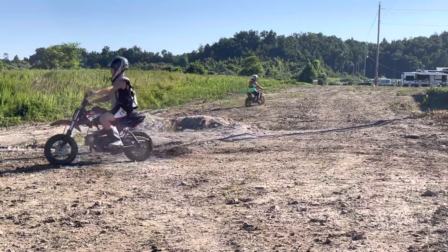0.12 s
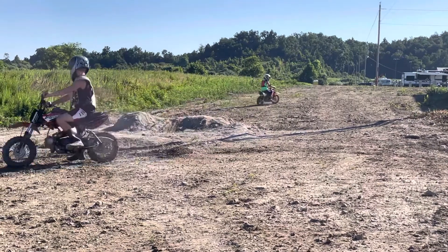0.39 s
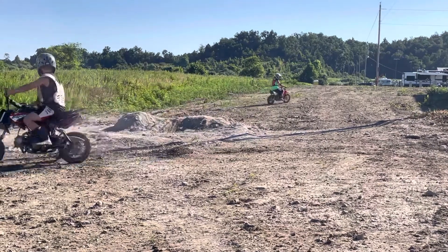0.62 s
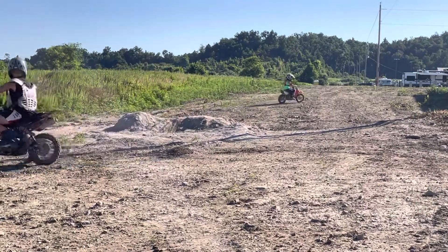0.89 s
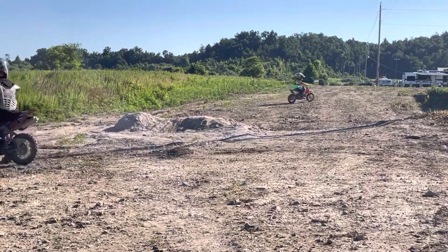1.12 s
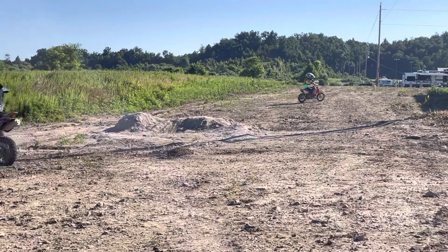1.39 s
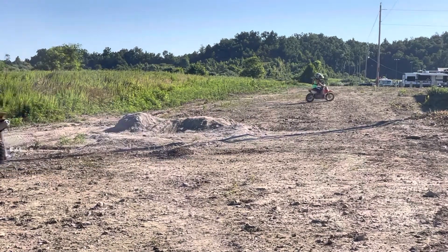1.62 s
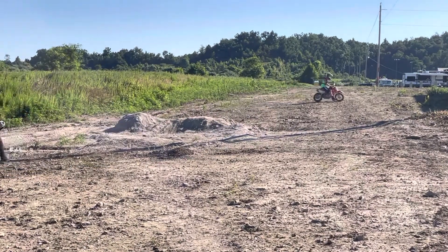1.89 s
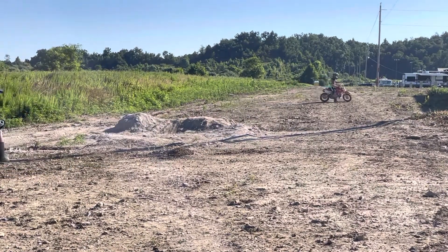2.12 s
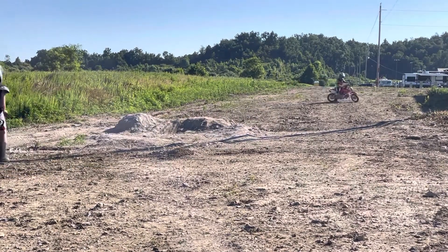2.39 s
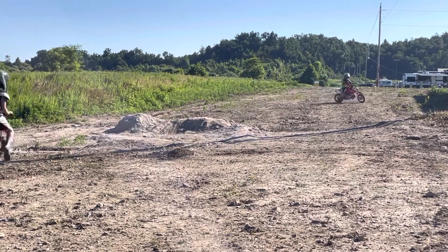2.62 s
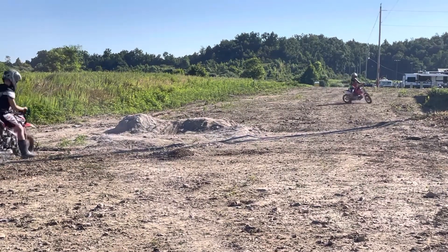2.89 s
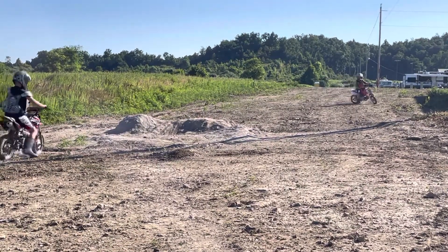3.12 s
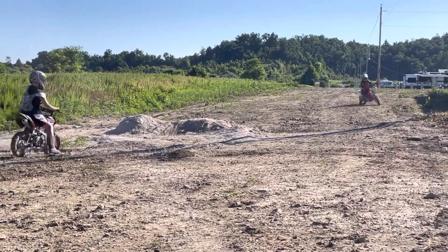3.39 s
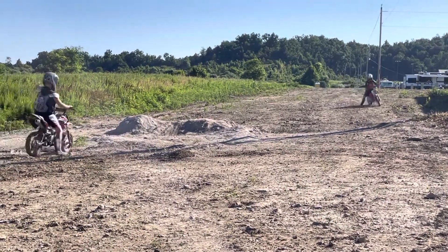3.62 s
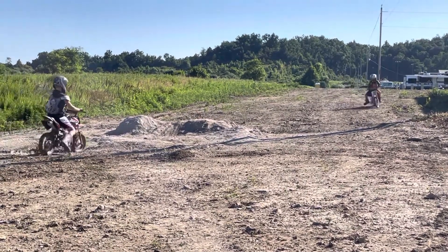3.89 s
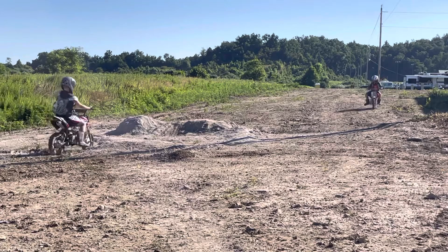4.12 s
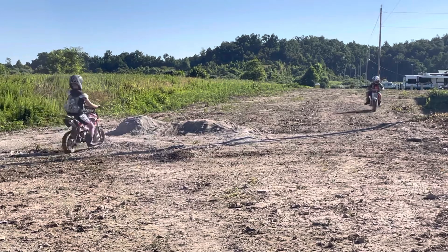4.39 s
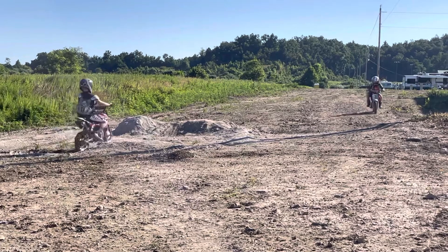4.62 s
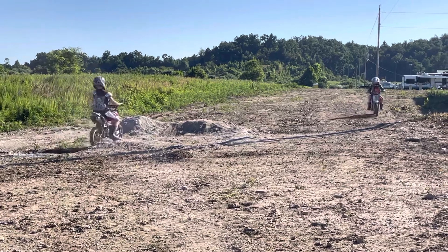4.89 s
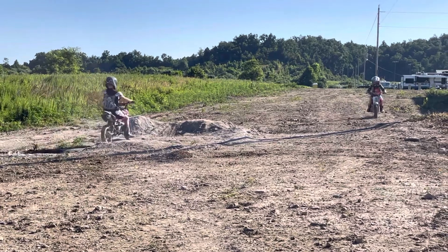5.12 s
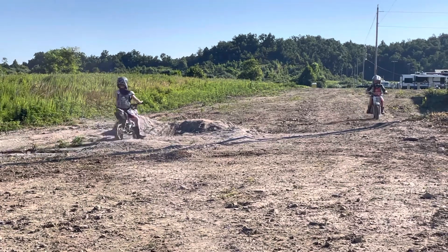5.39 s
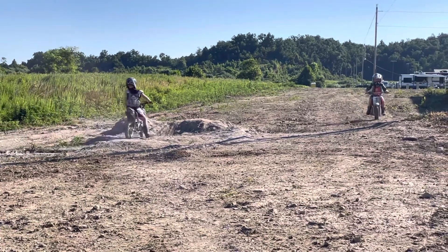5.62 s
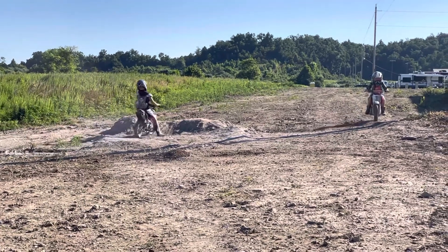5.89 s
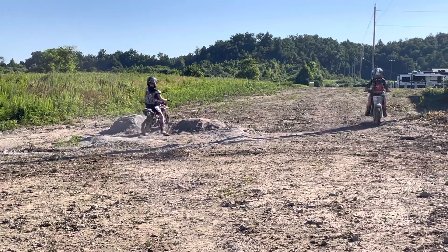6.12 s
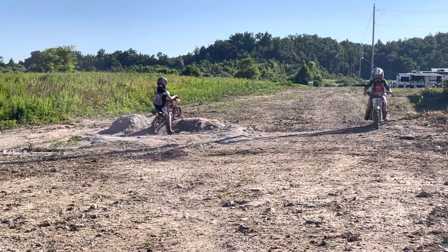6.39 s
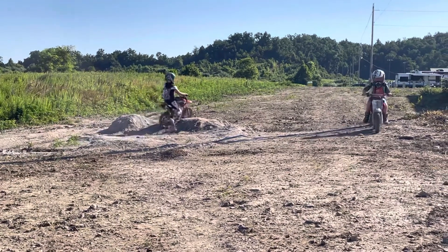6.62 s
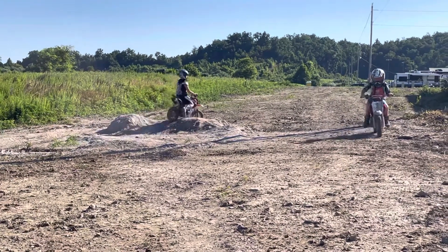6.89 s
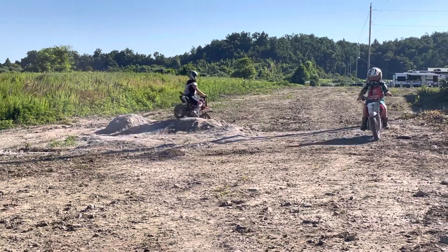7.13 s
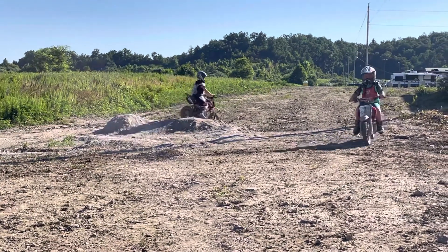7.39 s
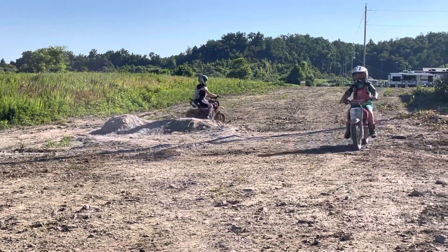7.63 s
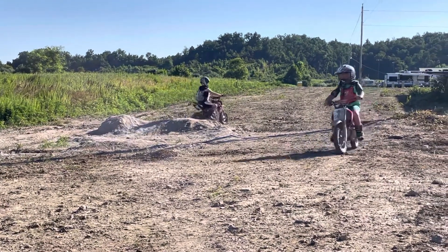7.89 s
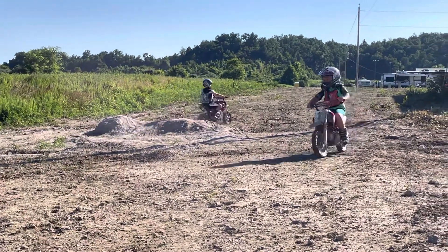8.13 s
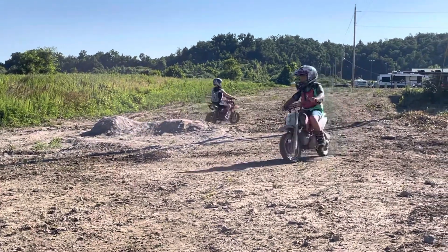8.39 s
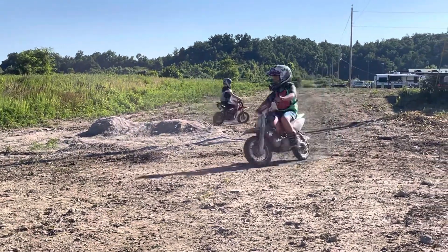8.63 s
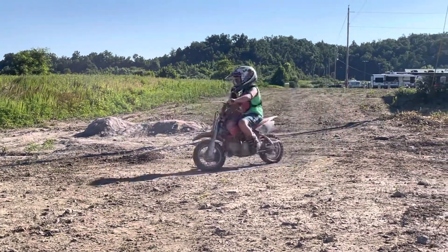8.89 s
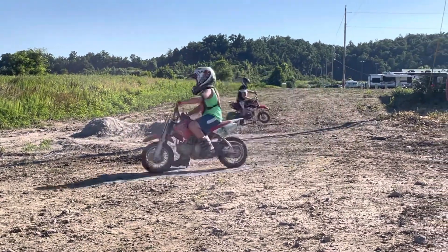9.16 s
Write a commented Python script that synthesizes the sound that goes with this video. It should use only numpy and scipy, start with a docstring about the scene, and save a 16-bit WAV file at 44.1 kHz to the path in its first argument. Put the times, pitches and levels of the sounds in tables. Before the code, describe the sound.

Outdoors on a dirt lot, a small single-cylinder motorbike burbles close by, slowing to separate putts by two seconds, then revving in bursts. Its longest, highest pull comes around four to six seconds, before it sinks and revs again near eight. A second bike thumps duller in the distance. Tyres scrub grit, insects hiss faintly, birds peep, and breeze rumbles low on a stereo phone microphone.

```python
"""A dirt lot in summer: two small single-cylinder motorbikes circle before a two-port phone microphone.
Every firing of the near one excites pipe modes, a sharp crack at the mouth and the engine cases.
The far one is mostly silencer thump, with some bark, rasp and hum. Tyres scrub the dirt as filtered
noise, insects hiss in the grass, birds peep as gliding sines, a stone ticks on metal,
and a breeze nudges the microphone with puffs of low noise."""
import sys
import numpy as np
from scipy import signal
from scipy.fft import rfft, irfft, next_fast_len
from scipy.io import wavfile
from scipy.ndimage import uniform_filter1d

SR = 44100
rng = np.random.default_rng(int(sys.argv[2]) if len(sys.argv) > 2 else 0)


def store_wav(level_fs):
    """Save 16-bit WAV to argv[1]."""
    pcm = np.round(np.clip(np.atleast_2d(level_fs), -1, 1) * 32767)
    wavfile.write(sys.argv[1], SR, pcm.T.astype(np.int16))


def undo_db(level):
    """Turn decibels back into plain size, where 20 dB means ten times bigger."""
    steps = np.asarray(level, float) / 20
    return 10 ** steps


N = 408807
T = np.arange(N) / SR  # s

# Near bike as it turns and moves about. Each row: time in seconds, nearness in dB,
# pipe turned to the microphone in dB.
NEAR = [(0, 4, -5.5), (.25, 5.5, -10), (.6, 0, 0), (1.1, 2.5, -5), (1.4, 4, -7), (1.7, -0.5, -1.5),
        (1.9, 1.5, -3.5), (2.1, 0, 1.5), (2.3, -2.5, 6.5), (2.5, 0, 3), (2.6, 1.5, -4), (2.75, 0, 1.5),
        (2.87, 1, 0), (2.99, 1.5, -1.5), (3.06, 2, -5), (3.5, 0.5, -1), (3.9, 2.5, -4.5), (4.2, 0.5, 1),
        (4.7, 3, -4.5), (4.9, 0, -0.5), (5.1, -2.5, 2), (5.22, 0.5, -2), (5.33, -2, 1.5), (5.5, -2, 1),
        (5.7, 0, -1), (5.95, -4, 3), (6.12, 0, -2.5), (6.3, 0, -2), (6.45, -2.5, -0.5), (6.6, 2, -4),
        (7.1, 1.5, -7), (7.6, 0.5, -1.5), (8.0, -4, 5), (8.3, 0.5, -2), (8.6, -1.5, 0), (9.27, 1.5, -4.5)]
# Shock front at the pipe mouth. Each row: frequency in Hz, relative density in dB per Hz.
CRACK = [(1200, -43), (1900, -3.5), (2300, 5.5), (3200, -1), (5000, -8), (6500, 2), (8000, 0.5),
         (10000, -2.5), (13000, -5.5), (14500, 0), (15800, -24), (16300, -52)]
# Silencer modes off the throttle, in both bikes. Each row: frequency in Hz before any slide, width in Hz,
# relative level in dB, delay after the firing in ms. Every mode table below has these columns.
COASTING = [(259, 124, 1.5, 0.71), (361.8, 48, -1, 0.43), (443.7, 56, -9, 0.4)]


def evened(x):
    """Scales to rms 1."""
    return x / np.sqrt(np.mean(x ** 2) + 1e-20)


def read(points, hz):
    """A spectrum table on a log-frequency axis."""
    f, value = np.transpose(points)
    return np.interp(np.log(hz + 1), np.log(f + 1), value)


def curves(rows):
    """Every column of a timed table, sample by sample."""
    s, *columns = np.transpose(rows)
    return [np.interp(T, s, column) for column in columns]


def bumps(rows):
    """Smooth humps from rows of middle in seconds, length in seconds and height in dB."""
    out = np.zeros(N)
    for middle, length, db in rows:
        phase = np.clip((T - middle) / length, -.5, .5)
        out += undo_db(db) * np.cos(np.pi * phase) ** 2
    return out


def wander(low_hz, high_hz):
    """Slow chance of rms 1: twelve sines of random phase, the slower the stronger."""
    waves = [np.sin(2 * np.pi * (f * T + rng.random())) / np.sqrt(f)
             for f in np.geomspace(low_hz, high_hz, num=12)]
    return evened(sum(waves))


def coloured(points):
    """Noise of rms 1 with a given spectrum."""
    size = next_fast_len(N)
    hz = np.fft.rfftfreq(size, 1 / SR)
    white = rng.standard_normal(size)
    return evened(irfft(rfft(white) * undo_db(read(points, hz)), size)[:N])


def steady(envelope):
    """Keeps the beat of an envelope, with its power over a few cycles at 1."""
    return envelope / np.sqrt(uniform_filter1d(envelope ** 2, size=6000))


def firings(turns, rough, late_ms, spread_db):
    """One click a cycle; rough running scatters the clicks in time and strength."""
    at = np.flatnonzero(np.diff(np.floor(turns)))
    late, size = rng.standard_normal((len(at), 2)).T
    shift = (late * rough[at] * late_ms * SR / 1000).astype(int)
    clicks = np.zeros(N)
    clicks[np.clip(at + shift, 0, N - 1)] = undo_db(spread_db * (0.43 + 1.3 * rough[at]) * size)
    return clicks


def puffs(clicks, rise_ms, fall_ms):
    """Gas-flow envelope after each click."""
    ms = np.arange(4096) * 1000 / SR
    puff = (1 - np.exp(-ms / rise_ms)) * np.exp(-ms / fall_ms)
    return signal.oaconvolve(clicks, puff)[:N]


def ring(clicks, level_db, modes, rate, noise_share, gust_s=.008, lift=1.):
    """Each mode swells and dies after its delay; turbulent flow shakes the same modes."""
    t = np.arange(4096) / SR
    pulse = np.zeros(4096)
    for hz, width, db, delay_ms in modes:
        u = np.maximum(t - delay_ms / 1000, 0)
        swell = width ** 1.5 * u * np.exp(-np.pi * width * u)
        pulse += undo_db(db) * swell * np.sin(2 * np.pi * hz * u)
    blows = clicks * undo_db(level_db) * np.sqrt(SR / rate)  # energy of one cycle
    gust = np.exp(-t / gust_s) / np.sqrt(gust_s * SR / 2)
    flow = signal.oaconvolve(blows, gust)[:N] * rng.standard_normal(N)
    share = np.clip(noise_share, 0, 1)
    drive = np.sqrt(1 - share) * blows + np.sqrt(share) * flow
    # lift runs the clock of the modes faster, which raises their pitch
    clock = np.cumsum(lift * np.ones(N))
    struck = np.bincount(clock.astype(int), drive * np.sqrt(lift))
    rung = signal.oaconvolve(struck, pulse / np.linalg.norm(pulse))
    return np.interp(clock, np.arange(len(rung)), rung)


def near_bike():
    """One engine cycle drives pipe and crack at the firing, and intake noise later in the cycle."""
    # Engine speed. Each row: time in seconds, firings per second.
    speed = [(0.0, 27.32), (0.3, 25.225), (0.65, 20.043), (1.078, 16.277), (1.271, 15.424), (1.6, 13.0),
             (1.954, 11.015), (2.15, 15.899), (2.342, 20.49), (2.61, 24.323), (2.745, 20.394),
             (2.999, 27.374), (3.232, 23.258), (3.6, 20.795), (3.96, 17.322), (4.1, 22.92), (4.235, 25.162),
             (4.462, 28.636), (4.62, 32.014), (4.76, 32.557), (4.9, 34.282), (5.101, 35.915), (5.184, 34),
             (5.3, 34.6), (5.42, 35.4), (5.527, 37), (5.66, 35), (5.792, 30.5), (6.0, 33), (6.1, 34.5),
             (6.2, 35.3), (6.328, 36.4), (6.45, 34.9), (6.6, 25.7), (6.83, 23.224), (6.956, 26.565),
             (7.3, 19.926), (7.698, 15.649), (7.85, 17.283), (8.021, 23.388), (8.14, 23.66), (8.27, 26.393),
             (8.526, 20.486), (8.9, 20.044), (9.27, 17.33)]
    # Which parts face the microphone. Each row: time in seconds, crankcase hum in dB,
    # pipe buzz in dB, loose metal in dB.
    parts = [(0, 5, 2.5, -6), (.35, 2, 4, -6), (.7, 3.5, 2.5, -4), (1.1, 1, 2, -3), (1.5, 3, -2, 0),
             (1.8, -3, 0, 0), (2.2, 0.5, 2.5, -4), (2.6, 1.5, 2.5, -6), (3, 3, 2.5, -11), (3.6, 3.5, 3, 0),
             (4.1, 12, 3, -0.5), (4.35, 3, 5.5, 0), (4.6, 6.5, 2, 0), (5.05, 3, 5, 0.5),
             (5.4, -2.5, 5, -3.5), (6, -2.5, 4, -4), (6.3, -5.5, 6, 2), (7, 3.5, -9, -2),
             (7.8, -2, 4.5, -3), (8.3, 4.5, 3.5, -15), (9.27, 0, 4, -6)]
    (rate,), throttle = curves(speed), throttle_opening()
    thump_db, bark_db, rasp_db, clatter_db, crack_db = layer_levels(rate, throttle)
    facing_db = curves(NEAR)[1]
    hum_db, buzz_db, loose_db = curves(parts)
    turns = .555 + np.cumsum(rate) / SR  # part of the first cycle is already gone
    rough = 1 - .97 * throttle
    clicks = firings(turns, rough, late_ms=.4, spread_db=.6)
    intake = firings(turns - .35, rough, late_ms=1.5, spread_db=3)
    hot = np.clip((rate - 24) / 12, 0, 1)  # running fast
    putting = (1 - throttle) * (1 - hot)  # slow coasting
    # slow open-throttle firings crack hardest, heard from behind
    sharp = throttle * np.clip(2.1 - rate / 21, .3, 1) * np.clip(1 + facing_db / 6, .1, 1)
    out = near_pipe(clicks, rate, throttle, hot, putting, thump_db, bark_db, rasp_db, buzz_db)
    out += crankcase(clicks, intake, rate, throttle, clatter_db - 2 + hum_db)
    out += clatter(clicks, intake, throttle, hot, putting, clatter_db)
    out += loose_metal(intake * sharp, rate, clatter_db + loose_db)
    return out + pipe_crack(clicks, intake, rate, throttle, sharp, crack_db)


def throttle_opening():
    """0 shut to 1 open: each twist ramps up, holds and closes."""
    # Twists of the near throttle. Each row: starts to open in seconds, time to open in seconds,
    # let go in seconds, time to close in seconds.
    revs = [(-.1, .05, .1, .028), (1.98, .17, 2.61, .028), (2.7, .03, 3.11, .028), (4, .06, 5.1, .04),
            (5.295, .015, 5.525, .028), (6.005, .025, 6.34, .12), (7.8, .08, 8.36, .06)]
    opening = np.zeros(N)
    for start, rise, off, shut in revs:
        opening += np.clip(np.minimum((T - start) / rise, 1 - (T - off) / shut), 0, 1)
    return opening


def layer_levels(rate, throttle):
    """Mean level over a cycle of thump, bark, rasp, clatter and crack, following the controls."""
    # Each law: shut throttle in dB and open throttle in dB, both at 24 firings/s, then shut slope and
    # open slope in dB per firing/s, share of nearness in dB per dB, share of pipe direction in dB per dB.
    thump_law = (-25.5, -25.5, 0.7145, 0, 1.98, 0.91)
    bark_law = (-34.5, -30, .5, 0.39, 2.5, 1.48)
    rasp_law = (-54.5, -45.5, 0.68, 0.9449, 3, 1.8)
    clatter_law = (-53.5, -53, 0.7, 0.804, 2, 1.7)
    crack_law = (-56, -56.5, 0.86, 0.5, 4, 3)
    near_db, facing_db = curves(NEAR)
    above_cruise = rate - 24  # firings/s
    surge_db = 1.07 * wander(2.4, 9.1)  # an engine off the throttle hunts up and down
    levels = []
    for law in (thump_law, bark_law, rasp_law, clatter_law, crack_law):
        shut_db, open_db, shut_slope, open_slope, near, facing = law
        shut = shut_db + shut_slope * above_cruise + surge_db
        wide = open_db + open_slope * above_cruise
        levels.append(shut + throttle * (wide - shut) + near * near_db + facing * facing_db)
    return levels


def near_pipe(clicks, rate, throttle, hot, putting, thump_db, bark_db, rasp_db, buzz_db):
    """Pipe and silencer modes struck by each firing; throttle and speed choose which ones ring."""
    # Modes of the pipe and silencer: frequency in Hz before any slide, width in Hz, relative level in dB,
    # delay after the firing in ms.
    thump = [(95, 73, -5.5, 5.83), (137.5, 37, 0, 3.47), (175.4, 29.6, -15.5, 1.97)]
    putt = [(64.8, 28, -2, 1.2), (111.4, 42.3, 4, 0.8), (145.5, 49, 3, 0.55), (393.8, 42.5, -11, 5.09),
            (720, 346, -21.5, 0.55)]
    growl = [(270, 64, 0.45, 2.18), (311, 74, -1, 2.12)]
    bark = [(399.1, 25.7, 5, 1.68), (512, 29, -8, 0.71)]
    honk = [(366, 28, 8.5, 0.31), (450, 55, -3.5, 0.28)]
    rasp = [(488, 91, 2.5, 0.45), (700, 76, -1.5, 0.71)]
    buzz = [(923.6, 72, 0, 0.59), (1088, 45, -3, 0.56), (1176, 320, -8.5, 0.32)]
    # The coasting silencer honks for a few firings. Each row: middle in seconds, length in seconds,
    # level in dB over the bark.
    honks = [(0.517, 0.39, 3.5), (1.48, 0.18, 2.5), (3.342, 1, -3)]
    # Gas heat and load slide the modes. Each row: time in seconds, then the middle thump,
    # lower growl and upper rasp modes in Hz.
    slide = [(0, 140, 320, 697), (1.95, 126, 259.5, 690), (2.25, 130.4, 249.8, 686), (2.6, 142, 275.2, 744),
             (2.72, 136.9, 259, 737), (3.1, 141.5, 332, 717), (3.95, 124, 254, 690),
             (4.28, 148.5, 285.5, 740), (4.38, 150.1, 304.5, 640), (4.6, 154.5, 315, 690),
             (4.85, 179, 329.5, 688), (5.1, 160, 355.1, 720.6), (5.3, 143, 326, 700),
             (5.53, 143.6, 335, 727), (6, 149.7, 311, 740), (6.27, 138.6, 343.1, 680),
             (6.45, 139.3, 333.2, 720), (7.8, 115, 271.5, 756), (8.18, 133.4, 274.3, 758),
             (8.28, 140, 270, 644.7), (9.27, 134, 270, 687)]
    thump_hz, growl_hz, rasp_hz = curves(slide)
    uneven = 1 + .012 * (1 - .9 * throttle) * wander(3, 25)  # no two firings ring quite alike
    growl_share = .86 + .03 * hot  # of the bark
    buzz_share = .13  # of the rasp
    loaded, coasting = clicks * throttle, clicks * (1 - throttle)

    out = ring(clicks * np.sqrt(1 - putting), thump_db, thump, rate, .02,
               lift=thump_hz / thump[1][0] * uneven)
    out += ring(clicks * np.sqrt(putting), thump_db, putt, rate, .03, lift=uneven ** 2)  # short, dull
    out += ring(loaded * np.sqrt(growl_share), bark_db, growl, rate, .015,
                lift=growl_hz / growl[0][0] * uneven)
    out += ring(loaded * np.sqrt(1 - growl_share), bark_db, bark, rate, .015)
    out += ring(coasting, bark_db, COASTING, rate, .04, lift=uneven ** 2)
    out += ring(clicks * bumps(honks), bark_db, honk, rate, .05)
    out += ring(loaded * np.sqrt(1 - buzz_share), rasp_db, rasp, rate, .02,
                lift=rasp_hz / rasp[1][0] * uneven)
    out += ring(loaded * np.sqrt(buzz_share), rasp_db + buzz_db, buzz, rate, .02, lift=uneven)
    # coasting: a soft burble
    return out + ring(coasting, rasp_db + buzz_db, rasp + buzz, rate, .15)


def crankcase(clicks, intake, rate, throttle, case_db):
    """The cases knock under load and hum on between firings, rising in pitch as the engine strains."""
    # Case modes: frequency in Hz before the rise, width in Hz, relative level in dB, delay in ms.
    case_modes = [(1205.4, 137, 6.5, 0.61), (1320, 300, 2, 0.4)]
    strain = 1 + .0034 * uniform_filter1d(throttle, size=4000) * (rate - 18)
    knock = ring(intake * throttle, case_db - 13.5, case_modes, rate, .7, gust_s=.014, lift=strain)
    hum = ring(clicks, case_db - 3 * throttle, case_modes, rate, .91, gust_s=.056, lift=strain)
    return knock + hum


def clatter(clicks, intake, throttle, hot, putting, clatter_db):
    """Noise of engine cases and intake, pulsing with each intake stroke and firing."""
    # Each row: frequency in Hz, relative density in dB per Hz.
    clatter_colour = [(600, -25), (1000, -7), (1300, -1), (1750, -11), (2200, -4), (2650, 1), (3050, -1),
                      (3450, -9), (3850, 4), (4350, -7), (5200, 2), (5900, -8), (9000, -13), (16000, -24)]
    pulses = 7 * puffs(intake, 5, 7) + 2 * puffs(clicks, .5, 3)
    beat = 1 + throttle * (1 - .3 * hot) * pulses + putting * 4 * puffs(clicks, 1, 7)
    return undo_db(clatter_db) * steady(beat) * coloured(clatter_colour)


def loose_metal(strokes, rate, level_db):
    """Loose metal shaken by the intake stroke: broad modes driven by noise alone."""
    # Each row: frequency in Hz, width in Hz, relative level in dB, delay in ms.
    rattle = [(2650, 700, -9, 0.3), (3800, 450, 0, 2), (5000, 900, -1, 0.285)]
    return ring(strokes, level_db, rattle, rate, 1, gust_s=.016)


def pipe_crack(clicks, intake, rate, throttle, sharp, crack_db):
    """Each shock at the pipe mouth is a burst of hiss plus a bare pressure step."""
    snap = 1 + (3 + 32 * sharp) * puffs(clicks, .3, 2) + throttle * 2 * puffs(intake, 5, 7)
    hiss = steady(snap) * coloured(CRACK)
    step = undo_db(-19) * shocks(clicks * (.14 + sharp), rate)  # .14 remains with the throttle shut
    flicker_db = 1.2 * wander(9.4, 8.8)  # the crack comes and goes unevenly
    return undo_db(crack_db + flicker_db) * (hiss + step)


def shocks(clicks, rate):
    """The pressure step of each firing, coloured like the crack, rms 1 over a cycle for unit clicks."""
    front = np.fft.fftshift(irfft(undo_db(read(CRACK, np.fft.rfftfreq(256, 1 / SR)))))
    return signal.oaconvolve(clicks * np.sqrt(SR / rate), front / np.linalg.norm(front), "same")


def far_bike():
    """The same kind of engine further off: mostly the silencer carries, with a changing edge."""
    # Each row: time in seconds, firings per second, exhaust level in dB.
    far = [(0, 27, -29), (1, 27.7, -35.5), (1.35, 32.5, -45), (1.7, 36.5, -49), (2, 23.4, -41),
           (2.3, 18.8, -39.5), (3, 20.5, -29.5), (3.26, 27.2, -30), (3.5, 27.2, -34.5), (3.75, 27.3, -31),
           (3.95, 28.7, -26.5), (4.2, 30.4, -24), (4.5, 29.8, -26.5), (4.75, 39.4, -24.5), (5, 37, -23),
           (5.45, 42.6, -25), (5.6, 33, -28), (5.83, 36.4, -24), (6.3, 28.9, -22.5), (6.6, 27.6, -22.5),
           (6.8, 31.7, -20.5), (6.95, 31, -31), (7.17, 24.5, -32), (7.4, 21, -30.5), (7.7, 21.1, -29.5),
           (8.4, 17.4, -26.5), (8.87, 25.4, -31), (9.27, 22, -34)]
    # Each row: time in seconds, bark in dB against the thump, rasp in dB against the thump.
    far_edge = [(0, -7, -45.5), (1, -10.5, -42), (2, -5, -36), (3, -6, -23), (5, -8, -20.5),
                (6.2, -10, -21.5), (6.6, -13.5, -28), (7.2, -10.5, -20), (7.7, -11.5, -25), (8.3, -10, -25),
                (8.8, -10, -30.5), (9.27, -9.5, -17.5)]
    # Silencer modes: frequency in Hz before any lift, width in Hz, relative level in dB, delay in ms.
    far_thump = [(55.8, 31, -11.5, 0.45), (93.3, 94, -1, 4.66), (130.6, 43, -1, 5.03),
                 (156.8, 44, 2.5, 3.35), (172.5, 29.6, -8, 1.68)]
    far_rasp = [(530, 82, 1, 0.66), (700, 115, -2, 0.4)]
    lope_modes = [(56.4, 74, 0.003, 9.3), (82, 87, 0.024, 5.8)]
    # The silencer sings on one multiple of the firing rate while it pulls steadily.
    # Each row: middle in seconds, length in seconds, level in dB.
    drones = [(3.554, 0.35, -29.5), (4.05, 0.94, -40)]
    (rate, exhaust_db), (bark_db, rasp_db) = curves(far), curves(far_edge)
    turns = np.cumsum(rate) / SR
    clicks = firings(turns, np.full(N, .3), late_ms=1.0, spread_db=.7)
    lift = 1 + .0035 * (rate - 28) + .012 * wander(2, 18)
    slow = np.clip((33 - rate) / 6, 0, 1)  # a slowing engine lopes deeper
    out = ring(clicks, exhaust_db, far_thump, rate, .03, lift=lift)
    out += ring(clicks * slow, exhaust_db - 9, lope_modes, rate, .12)
    out += ring(clicks, exhaust_db + bark_db, COASTING, rate, .12, lift=lift)
    out += ring(clicks, exhaust_db + rasp_db, far_rasp, rate, .2)
    out += bumps(drones) * np.sqrt(2) * np.sin(2 * np.pi * 6 * turns)  # sixth multiple
    return out + far_hum()


def far_hum():
    """A thin hum from the approaching engine: a narrow band of noise that swells and fades."""
    # Each row: middle in seconds, length in seconds, level in dB.
    hums = [(7.12, 0.34, -60), (8.534, 0.45, -58), (9.05, 0.72, -55.5)]
    middle, width = 1373, 15  # Hz
    band = [(middle - 3 * width, -40), (middle - width / 2, 0), (middle + width / 2, 0),
            (middle + 3 * width, -40), (SR / 2, -80)]
    return bumps(hums) * coloured(band)


def tyres():
    """Knobbly tyres scrub over dry dirt: a grainy wash of grit, made of fluttering noise."""
    # Each row: middle in seconds, length in seconds, level in dB before the flutter.
    scrubs = [(0.098, 1.5, -50), (4.7, 3.1, -63.5), (8.3, 2.2, -60)]
    # Colour of the dirt. Each row: frequency in Hz, relative density in dB per Hz.
    dirt = [(500, -30), (1000, -3), (1250, 0), (1800, -5), (2400, -4), (3400, -7), (4500, -14), (8000, -35)]
    return bumps(scrubs) * undo_db(2.2 * wander(7.1, 80)) * coloured(dirt)


def small_sounds():
    """Birds peep as short gliding whistles that echo off the hedge; a stone ticks dryly on metal."""
    # Bird peeps. Each row: start in seconds, length in seconds, first and last pitch of the glide in Hz
    # before the hump, level in dB before the fades.
    peeps = [(1.942, .03, 6300, 7700, -43), (5.682, .024, 4000, 3300, -51), (5.858, .024, 4000, 3400, -50),
             (5.998, .066, 6000, 6020, -51), (6.068, .022, 5100, 4200, -52), (6.312, .03, 4950, 4000, -48),
             (6.565, .026, 4550, 4050, -52), (7.4, .124, 1640, 2500, -37)]
    # Echoes off the hedge. Each row: delay in seconds, level in dB.
    peep_echoes = [(.022, -13), (.045, -17)]
    # Ticks of a stone on metal. Each row: start in seconds, first peak in dB, frequency in Hz.
    ticks = [(1.172, -45, 12000), (1.18, -41.5, 11000), (1.188, -48, 12200)]
    out = np.zeros(N)
    for s, length, from_hz, to_hz, db in peeps:
        u = np.arange(0, length, 1 / SR) / length
        rising = to_hz > from_hz
        fade = np.sqrt(np.sin(np.pi * u))
        glide = np.sin(np.pi / 2 * u ** (2.6 if rising else 1)) ** 2  # a rising call glides late
        hz = (from_hz + (to_hz - from_hz) * glide) * (1 + .05 * fade)  # with a pitch hump
        strain = (hz / hz.max()) ** (6 * rising)  # a rising call grows louder as it climbs
        whistle = np.sqrt(2) * np.sin(2 * np.pi * np.cumsum(hz) / SR)
        out[round(s * SR):][:len(u)] += undo_db(db) * fade * strain * whistle
    out = out + sum(undo_db(db) * np.roll(out, round(s * SR)) for s, db in peep_echoes)
    t = np.arange(400) / SR
    for s, db, hz in ticks:
        out[round(s * SR):][:400] += undo_db(db - 60 * t / .016) * np.sin(2 * np.pi * hz * t)
    return out


def breeze():
    """Puffs of breeze on the microphone: a low lumpy rumble that swells and passes."""
    # Each row: middle in seconds, length in seconds, level in dB before the lumps.
    gusts = [(3.706, 1.07, -49), (4.787, 1.9, -28.5), (5.619, 0.96, -25), (6.51, 0.93, -36),
             (7.202, 0.77, -26.5)]
    # Each row: frequency in Hz, relative density in dB per Hz.
    breeze_colour = [(26, -30), (40, 0), (55, 0), (90, -14), (200, -40), (500, -110)]
    return bumps(gusts) * undo_db(2.2 * wander(3, 14)) * coloured(breeze_colour)


def field():
    """Distant rumble and the insect chorus as one noise, fluttering a little."""
    # Open-air floor with the insect band. Each row: frequency in Hz, relative density in dB per Hz.
    field_colour = [(24, -43), (48, 6), (141, 4.5), (354, -12.5), (500, -22), (800, -25.5), (1190, -24.5),
                    (1450, -25.5), (1750, -32), (2600, -32.5), (3480, -33), (4200, -35.5), (4600, -19.5),
                    (5200, -24), (5700, -35.5), (7000, -44), (10000, -42), (16000, -107)]
    return undo_db(-36.5 + .8 * wander(2, 60)) * coloured(field_colour)


def scene():
    """Direct sound to both ports, plus scatter off the rough ground that differs left and right."""
    # Scattered share. Each row: frequency in Hz, level in dB against the direct sound.
    apart = [(30, -17), (90, -19), (200, -21), (400, -18), (700, -11), (1500, -16), (3000, -26),
             (6000, -17), (16000, -14)]
    direct = near_bike() + far_bike() + tyres() + small_sounds() + breeze() + field()
    taps = rng.standard_normal(8192) * np.exp(-np.arange(8192) / SR / .047)
    taps = taps / np.linalg.norm(taps)
    hz = np.fft.rfftfreq(16384, 1 / SR)
    scatter = irfft(rfft(taps, 16384) * undo_db(read(apart, hz)), 16384)
    side = signal.oaconvolve(direct, scatter)[:N]
    return np.array([direct + side, direct - side])


def band_limit(x):
    """A steep low-pass at the top of the band."""
    return signal.sosfilt(signal.butter(12, 16110, fs=SR, output="sos"), x)


def record(dry):
    """The phone microphone rolls off the bass; its ports differ in phase and a little in level."""
    # Each row: frequency in Hz, level of the left port over the right in dB.
    tilt = [(60, 0.0), (180, 0.5), (550, 0.5), (1650, 2.0), (4970, 0.0), (15000, 0.0)]
    # Each row: frequency in Hz, phase by which the left port leads in radians.
    lead = [(0, 0), (6200, -0.0), (6800, -0.8), (7410, -1.9), (7750, -3.0), (8870, -3.4), (10200, -5.2),
            (10400, -6.1), (12300, -6.4), (12900, -7.2), (14000, -9.2), (15700, -9.5)]
    size = next_fast_len(N + 4096)
    hz = np.fft.rfftfreq(size, 1 / SR)
    half = undo_db(read(tilt, hz) / 2) * np.exp(.5j * read(lead, hz))  # half the difference to each port
    low_cut = hz ** 2 / np.sqrt(hz ** 4 + 58.2 ** 4)
    low_cut = low_cut * hz ** 2 / np.sqrt(hz ** 4 + 36 ** 4)
    ports = irfft(rfft(dry, size) * low_cut * np.array([half, 1 / half]), size)[:, :N]
    return band_limit(ports)


dry = scene()
out = record(dry)
store_wav(out)
```